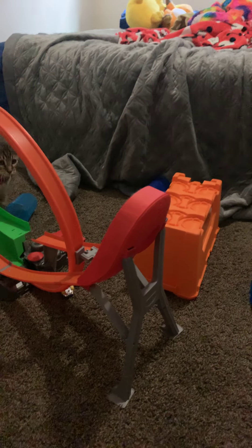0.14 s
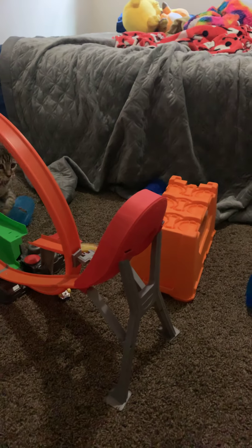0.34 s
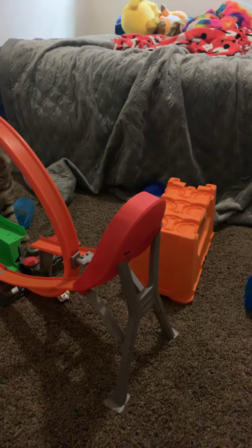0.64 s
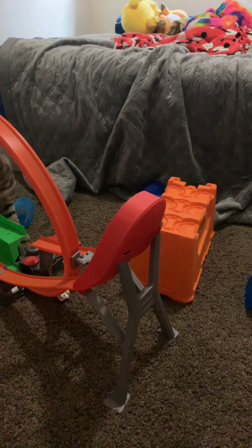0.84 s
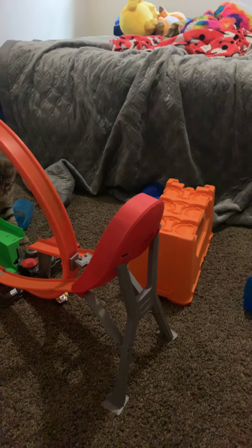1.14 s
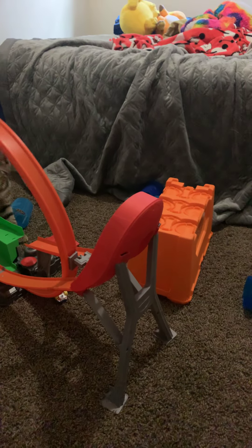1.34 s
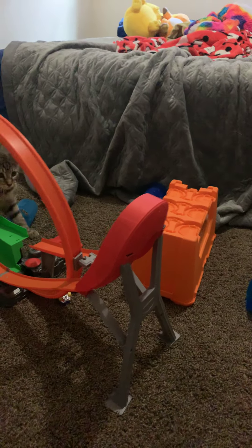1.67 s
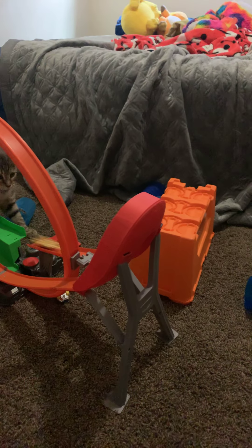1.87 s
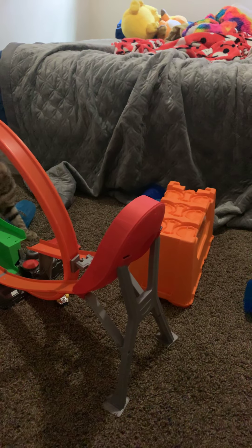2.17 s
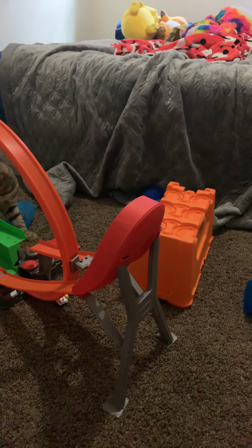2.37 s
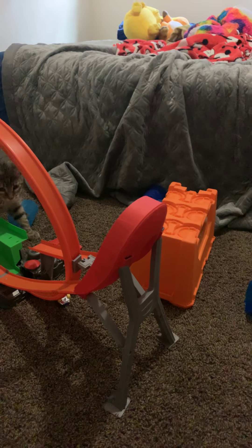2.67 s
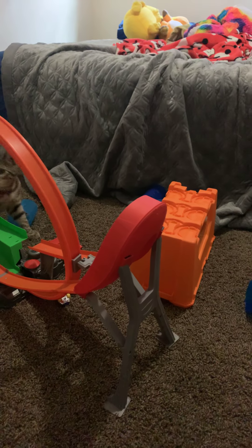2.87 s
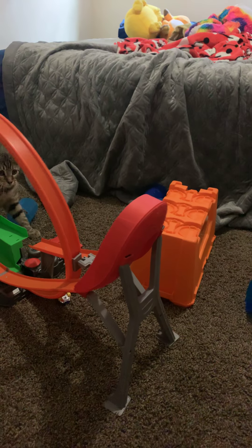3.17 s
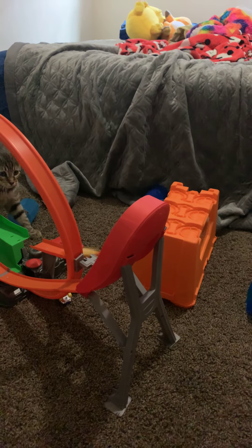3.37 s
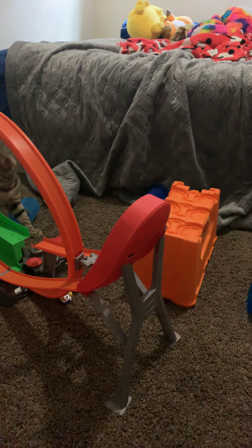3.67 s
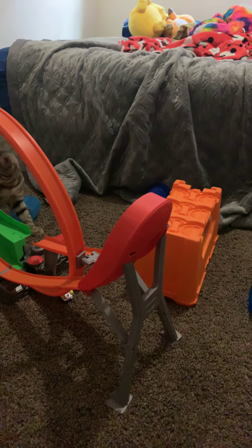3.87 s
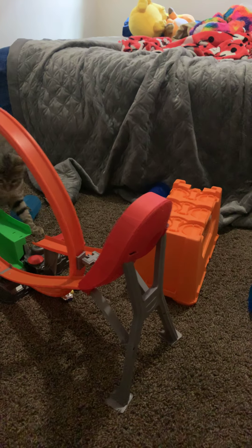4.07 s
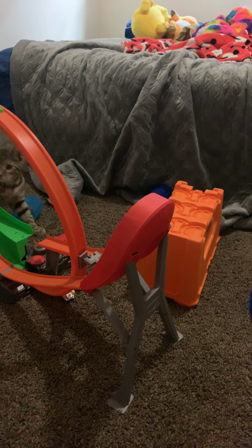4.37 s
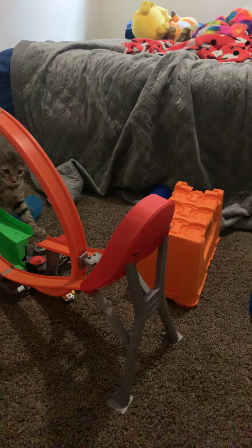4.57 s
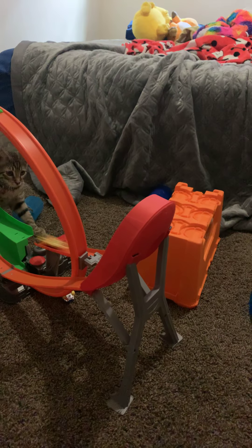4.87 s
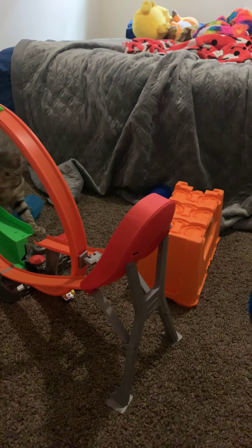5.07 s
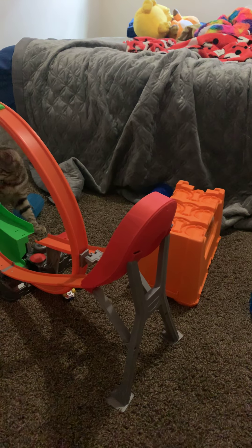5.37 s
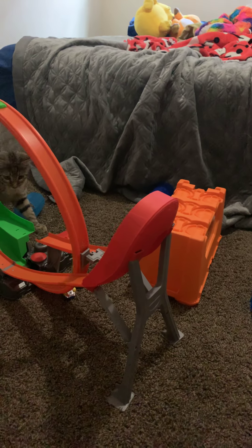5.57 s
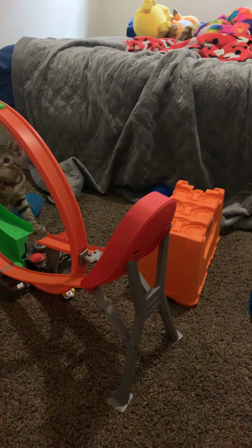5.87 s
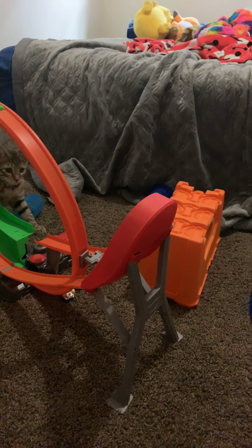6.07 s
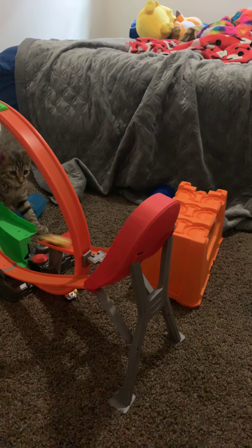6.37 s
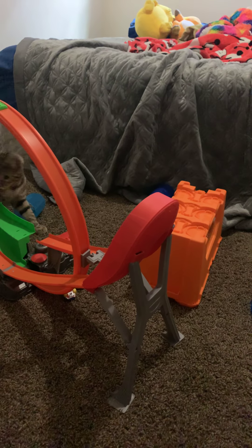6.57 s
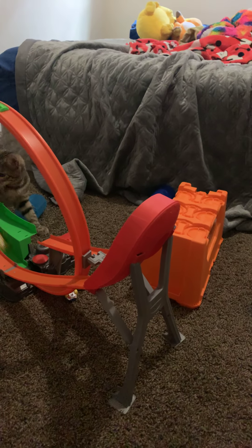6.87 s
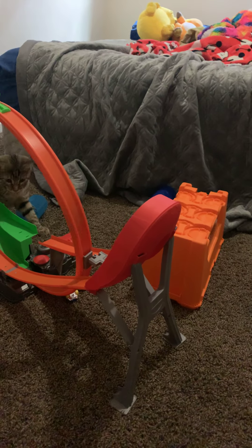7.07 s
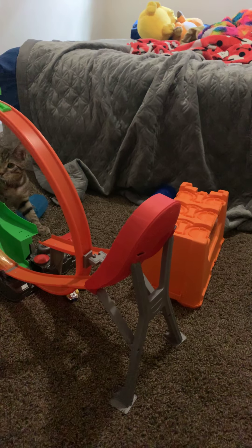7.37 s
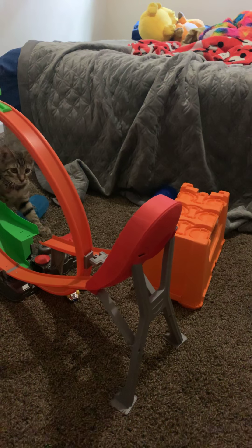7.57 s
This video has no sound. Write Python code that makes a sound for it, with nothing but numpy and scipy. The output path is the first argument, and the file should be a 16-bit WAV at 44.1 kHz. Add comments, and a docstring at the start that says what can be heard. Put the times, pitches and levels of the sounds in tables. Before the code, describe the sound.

A small metal toy car rattles and clacks round a plastic loop track, flung along by a droning, ticking motorized booster.

```python
"""In a carpeted room, a metal toy car laps a plastic track about every 1.5 s.
A battery booster drones and ticks all the time and flings the car twice a lap. The car runs round
a loop and over a ramp: its wheels chatter and whirr on the plastic, and its body clacks against
the joints. Three dull bumps come from the carpet, and the close walls add a short echo."""
import sys
import numpy as np
from scipy import signal
from scipy.fft import rfft, irfft
from scipy.io import wavfile

SR = 44100
rng = np.random.default_rng(int(sys.argv[2]) if len(sys.argv) > 2 else 0)


def to_wav(sig):
    """Store sig (one row per channel, or 1-D mono) as 16-bit WAV at the path in sys.argv[1].

    Samples outside -1..1 are clipped; the rate is SR.
    """
    pcm = np.clip(np.atleast_2d(sig), -1, 1) * 32767
    pcm = np.round(pcm).astype(np.int16)
    wavfile.write(sys.argv[1], SR, pcm.T)  # frames by channels


N = 340672
TIME = np.arange(N) / SR
ROOM_T60_S, ROOM_TREBLE_T60_S, ROOM_DB = 0.31, 0.24, -5  # a t60 is the time to fade by 60 dB
SPLIT_HZ = 1250  # rumble and thud lie below this, chatter and crack above

# dull bumps on the carpet: t/s, level/dB
CARPET_BUMPS = [(0.97, -49), (4.455, -43), (5.598, -54)]
# how loud the gears tick as time goes on: t/s, level/dB
TICK_LEVELS = [(0, -50), (.8, -45), (2.3, -44.5), (3.85, -46), (5.3, -48.5), (6.8, -45), (7.7, -43)]
# the car knocks on joints and walls: t/s, rough peak level/dB, clink f/Hz, clink against crack/dB
CAR_KNOCKS = [(0.018, -25, 3740, 6), (0.128, -26, 3930, 9), (0.173, -13, 3800, -11), (0.218, -17, 4570, 1),
              (0.256, -17, 5290, -8), (0.514, -17, 5100, -4), (0.537, -21, 4130, 7), (0.585, -16, 4600, -9),
              (0.619, -8, 4550, -5), (0.653, -18, 5800, 2), (0.827, -32, 5600, 2), (0.973, -20.5, 5430, 2),
              (1.026, -26, 4670, 5), (1.079, -20, 4590, 4), (1.091, -13, 5450, -15), (1.299, -23, 7340, -4),
              (1.497, -21, 4280, -7), (1.509, -20, 3800, -1), (1.518, -22, 4340, 3), (1.659, -13, 3600, -4),
              (1.827, -20, 3420, -6), (1.999, -17.5, 4150, -2), (2.008, -20, 3650, 0),
              (2.071, -13, 4470, -14), (2.123, -14.5, 4600, -7), (2.231, -26, 4750, -11),
              (2.439, -22, 5360, -11), (2.461, -20, 3800, -6), (2.552, -12, 4130, -6),
              (2.813, -22, 3610, -11), (3.016, -24, 4440, -6), (3.029, -20, 3730, -2),
              (3.039, -27, 4480, 8), (3.195, -12.5, 5530, -4), (3.242, -17, 4100, -5),
              (3.372, -19, 5340, -6), (3.547, -18, 4050, -1), (3.571, -14, 4270, -3), (3.580, -20, 3160, 6),
              (3.617, -15, 3080, -9), (3.653, -15, 5700, -8), (3.681, -7.5, 5030, -1),
              (3.917, -28, 4030, -2), (3.973, -17.5, 5600, 1), (4.098, -18, 5100, -14),
              (4.512, -18, 4340, 0), (4.520, -25, 4400, 7), (4.659, -14, 3750, -3), (4.843, -21, 3120, -8),
              (4.997, -19.5, 3660, 0), (5.008, -22, 3410, 5), (5.094, -14, 4540, -10),
              (5.454, -21, 5960, -6), (5.484, -18.5, 5220, 5), (5.577, -17, 4220, -15),
              (5.904, -27, 3880, 5), (5.994, -21, 5900, -9), (6.008, -22, 4200, -6), (6.159, -12, 3610, -6),
              (6.322, -15.5, 3580, -3), (6.496, -18, 3400, -3), (6.520, -17, 3420, 3),
              (6.562, -12, 4430, -6), (6.596, -10.5, 5370, -15), (6.879, -27, 5800, -4),
              (6.921, -20, 5700, 0), (7.027, -16, 3400, -4), (7.467, -15.5, 3830, -3),
              (7.483, -20, 4270, 2), (7.636, -17, 3510, 1)]

# the tone colour of each part, from bass to treble: f/Hz, level/dB
MOTOR_COLOUR = [(25, -62), (50, -15), (80, -6), (170, -15), (270, -10), (400, -7), (500, -3.5), (900, -3),
                (1300, -5.5), (2500, -11), (3800, -9), (5200, -6), (7500, -13), (9700, -13.5), (15500, -34)]
BOOSTER_COLOUR = [(35, -40), (60, -18), (226, -11.5), (385, -7.5), (486, -1.5), (613, -7.5), (773, -11),
                  (1100, -5), (1350, -7.5), (2780, -9), (3050, -3.5), (3420, -9), (4630, -7), (10400, -14),
                  (15500, -27.5)]
LOOP_COLOUR = [(59, -52), (100, -30), (438, -15.5), (614, -1.5), (668, -3.5), (1040, -5.5), (1340, -10.5),
               (1800, -10), (2420, -3), (2870, -4.5), (4280, -1.5), (4960, -4), (9340, -11), (10400, -10),
               (15500, -22.5)]
RAMP_COLOUR = [(35, -49), (60, -40), (145, -4.5), (175, -19), (231, -.5), (312, -11.5), (359, -16),
               (613, -1), (849, -6.5), (1120, -0.5), (1910, -1.5), (3670, 1.7), (5580, 1.2), (9970, -5.5),
               (15500, -18)]
KNOCK_COLOUR = [(100, -15), (230, -3), (380, 4.5), (500, 7), (1000, -4.5), (2000, -9.5), (3200, -1),
                (5500, 1), (8000, -2), (11000, -5.5), (15500, -19)]
# pitches that the gear teeth, booster housing and open track lift or dull: f/Hz, width/Hz, lift/dB
GEAR_RESONANCES = [(5250, 1300, 22), (5925, 370, 15), (6565, 87, 22.5), (9070, 1300, 1)]
HOUSING_RESONANCES = [(148, 24, 6.5), (228, 24, 3), (410, 127, -6.5), (500, 55, 2.8), (614, 98, 10),
                      (720, 100, 4), (779, 72, 5.5), (856, 28, 7), (938, 55, 4), (1017, 18, 4),
                      (1350, 200, -5.5), (4590, 140, 2.5), (5900, 220, 3.5)]
TRACK_RESONANCES = [(243, 40, -4.5), (384, 160, 2), (615, 37, 5), (1011, 31, 4.5), (1320, 47, -1.5),
                    (1594, 33, 6), (3705, 160, 3.5), (4480, 120, 4), (5890, 110, 6)]

# Four tables say when the car passes each place; 0 dB is a usual pass.
# the booster's first fling of a lap: t/s, chatter/dB, rumble/dB, grip whirr/dB, coasting whirr/dB
FIRST_FLING_PASSES = [(0.514, 0, 1, 0, -6), (1.998, .5, .5, -7, 0), (3.547, -.7, 1.5, 0, -7),
                      (4.997, .3, .5, -5, 2), (6.495, .3, 1, -1.5, -5)]
# its second fling, then the loop, then the ramp: t/s, chatter/dB, rumble/dB, whirr or swoosh/dB
SECOND_FLING_PASSES = [(1.083, 0, 0, -5), (2.546, 0, -1, -1), (4.092, 0, -1, -6), (5.570, .8, 1, 2),
                       (7.029, 0, 1, -1)]
LOOP_PASSES = [(-0.36, 0, 0, 0), (1.15, .5, 0, 0), (2.62, -1.7, -1.5, -2), (4.16, .7, 1, 1),
               (5.64, 0, 0, -2), (7.10, -1.5, 0, 1.5)]
RAMP_PASSES = [(0.116, -.5, 0, 0), (1.61, 0, -2.5, -3), (3.13, 0, -1, 0), (4.61, 0, -1, 2),
               (6.1, -.3, -.5, .5), (7.58, 1, 0, .5)]
CHATTER, RUMBLE, WHIRR, COASTING = 1, 2, 3, 4  # column numbers in these tables

# how the track shakes at each pass: delay/s, rise/s, hold/s, fade t60/s, level/dB
GRIP_CHATTER = (-.002, .043, .1, .32, -28.8)  # the booster's wheels seize the car
GRIP_RUMBLE = (.045, .02, .02, .4, -35.5)
ENTRY_RUMBLE = (-.001, .005, .025, .3, -41.5)
RETURN_CHATTER = (-.26, .17, .055, .45, -33.6)  # it rolls back towards the booster
RETURN_RUMBLE = (-.125, .015, .035, .45, -42.3)
KICK_CHATTER = (-.008, .018, .015, .38, -27.3)  # the second fling is one short kick
KICK_RUMBLE = (-.005, .014, .012, .28, -34.3)
CLIMB_CHATTER = (-.03, .04, .03, 1.5, -36.5)  # it slows on the way up the loop
DESCENT_CHATTER = (.1, .19, .15, .5, -34.4)  # and gathers speed on the way down
LOOP_RUMBLE = (-.06, .3, .16, .5, -46)
FOOT_CHATTER = (-.12, .025, .015, .3, -35)  # it presses into the foot of the loop, just before the ramp
FOOT_RUMBLE = (-.16, .025, .045, .3, -40.5)
RAMP_CHATTER = (-.028, .052, .055, 1.0, -28.6)
RAMP_RUMBLE = (.03, .04, .015, .45, -37.5)
RUNOUT_CHATTER = (.17, .035, .025, .72, -34.2)  # it comes off the ramp and coasts away
RUNOUT_RUMBLE = (.2, .03, .03, .6, -48)

# the whirrs and swoosh of each lap: delay/s, length/s, first f/Hz, last f/Hz, width/Hz, level/dB
GRIP_WHIRR = (.005, .16, 3050, 3040, 135, -35.3)
COAST_WHIRR = (.04, .23, 4590, 4590, 150, -43)
KICK_WHIRR = (0, .07, 3050, 3020, 200, -36)
LOOP_WHIRR = (-.03, .2, 2560, 2490, 250, -41.5)
DESCENT_WHIRR = (.22, .15, 4100, 4120, 400, -41)
LOW_DESCENT_WHIRR = (.21, .13, 2450, 2450, 250, -41.5)  # a second, lower whirr on the way down the loop
FOOT_WHIRR = (-.125, .08, 4200, 4100, 550, -42)
RAMP_SWOOSH = (.003, .085, 2800, 1250, 700, -34.3)


def undb(db):
    """Turn decibels into a number to multiply a sound by."""
    return 10 ** (np.asarray(db) / 20)


def unit(x):
    """Scale a sound so that its average strength (rms) is 1."""
    return x / np.sqrt(np.mean(x ** 2))


def keep_band(x, hz, side, order=4):
    """Keep the "low" or the "high" side of a sound, split at hz."""
    return signal.sosfilt(signal.butter(order, hz, side, fs=SR, output="sos"), x)


def fade(t, t60):
    """A fade that loses 60 dB by the time t reaches t60."""
    return np.exp(-np.log(1000) * t / t60)


def wander(rate):
    """A random drift of about size 1 that changes course rate times a second."""
    points = rng.standard_normal(N // 10)
    return unit(np.interp(TIME * rate, np.arange(len(points)), points))


def add(out, start_s, sound):
    """Mix a sound in at start_s, dropping whatever falls outside the scene."""
    start = int(start_s * SR)
    sound = sound[max(-start, 0):]
    start = max(start, 0)
    out[start:start + len(sound)] += sound[:max(N - start, 0)]


def ring(x, colour, resonances=(), size=8192):
    """Play x through an object that has a broad tone colour and rings at a few pitches."""
    f = np.arange(size // 2 + 1) * SR / size
    hz, db = np.transpose(colour)
    gain_db = np.interp(np.log(f + 1), np.log(hz), db)
    for centre, width, lift in resonances:
        gain_db = gain_db + lift / (1 + (2 * (f - centre) / width) ** 2)
    # these steps make the object ring only after each push, never before it
    cepstrum = irfft(np.log(undb(gain_db)))
    cepstrum[1:size // 2] *= 2
    cepstrum[size // 2 + 1:] = 0
    response = irfft(np.exp(rfft(cepstrum)))
    return signal.fftconvolve(x, response)[:len(x)]


def room(x):
    """Close walls answer within milliseconds; carpet and bedding soak up the treble first."""
    t = np.arange(SR // 2) / SR
    noise = rng.standard_normal(len(t))
    low = keep_band(noise, 2700, "low", order=1)
    tail = (low * fade(t, ROOM_T60_S) + (noise - low) * fade(t, ROOM_TREBLE_T60_S)) * (t > .004)
    echo = signal.fftconvolve(x, tail / np.sqrt(np.sum(tail ** 2)))[:N]
    return (x + undb(ROOM_DB) * echo) / np.sqrt(1 + undb(ROOM_DB) ** 2)


def carpet_bumps(t60, top_hz):
    """Soft, heavy bumps on the floor carry only bass."""
    out, t = np.zeros(N), np.arange(2 ** 14) / SR
    for start_s, db in CARPET_BUMPS:
        bass = keep_band(rng.standard_normal(len(t)), top_hz, "low", order=2)
        boom = unit(keep_band(bass, 50, "high"))
        soft_start = 1 - fade(t, t60 / 10)
        add(out, start_s, undb(db) * boom * fade(t, t60) * soft_start)
    return out


def chatter(per_second, spread_db, t60, hiss):
    """Tiny hits of uneven size each send a short shiver through the plastic, over a smooth hiss."""
    sizes = undb(spread_db * np.minimum(rng.exponential(size=N), 3))
    hits = (rng.random(N) < per_second / SR) * sizes ** 2
    energy = signal.lfilter([1], [1, -fade(2 / SR, t60)], hits)  # each hit dies away
    return unit(np.sqrt(energy / energy.mean() + hiss ** 2) * rng.standard_normal(N))


def booster_motor(drone_db, turn_hz, wobble, tick_t60, tick_spread_db):
    """The booster's gears drone in their housing; a loose gear ticks unevenly, once a turn."""
    grinding = chatter(per_second=540, spread_db=2.5, t60=0.02, hiss=1.0)
    drone = ring(grinding, MOTOR_COLOUR, HOUSING_RESONANCES)
    turns = np.cumsum(turn_hz * np.exp(wobble * wander(90))) / SR
    hits = np.diff(np.floor(turns), prepend=0) * undb(tick_spread_db * wander(100))
    bursts = signal.lfilter([1], [1, -fade(1 / SR, tick_t60)], hits) * rng.standard_normal(N)
    ticks = ring(bursts, [(1000, -11), (4000, -18), (8000, -1), (15000, -14)], GEAR_RESONANCES)
    tick_db = np.interp(TIME, *np.transpose(TICK_LEVELS))
    return undb(drone_db + 1.25 * wander(16)) * unit(drone) + undb(tick_db) * unit(ticks)


def wheel_whirrs(wobble):
    """Narrow, nearly steady whirrs ring at the same places every lap; a swoosh falls at the ramp."""
    out = np.zeros(N)
    places = [(FIRST_FLING_PASSES, WHIRR, GRIP_WHIRR), (FIRST_FLING_PASSES, COASTING, COAST_WHIRR),
              (SECOND_FLING_PASSES, WHIRR, KICK_WHIRR), (LOOP_PASSES, WHIRR, LOOP_WHIRR),
              (LOOP_PASSES, WHIRR, LOW_DESCENT_WHIRR), (LOOP_PASSES, WHIRR, DESCENT_WHIRR),
              (RAMP_PASSES, WHIRR, FOOT_WHIRR), (RAMP_PASSES, WHIRR, RAMP_SWOOSH)]
    for passes, column, (delay_s, length_s, first_hz, last_hz, width_hz, db) in places:
        progress = np.linspace(0, 1, int(length_s * SR))
        centre_hz = first_hz * (last_hz / first_hz) ** progress
        swell = np.sqrt(np.abs(np.sin(np.pi * progress)))
        for row in passes:
            real, imag, sway = rng.standard_normal((3, SR // 2))[:, :len(progress)]
            hz = centre_hz * (1 + wobble * unit(keep_band(sway, 37.5, "low", order=2)))
            # slow noise, moved up to that pitch, makes a rough tone
            buzz = keep_band(real + 1j * imag, width_hz / 2, "low", order=2)
            tone = unit(np.real(buzz * np.exp(2j * np.pi * np.cumsum(hz) / SR)))
            add(out, row[0] + delay_s, tone * swell * undb(db + row[column]))
    return out


def axle_rattle(spread_db, count=3600):
    """The loose axles and body tap at random; each tap rings briefly at a pitch of its own."""
    when, pitch, size, phase = rng.random((count, 4)).T[:, :, None]
    hz = 600 * 24 ** pitch
    samples = np.arange(2 ** 10)
    cycles = hz * samples / SR
    # plastic damps every pitch within 36 cycles, so high taps are shorter and harder
    taps = hz * undb(spread_db * size) * np.sin(2 * np.pi * (cycles + phase)) * fade(cycles, 36)
    positions = (when * N + samples).astype(int)
    return unit(np.bincount(positions.ravel(), taps.ravel(), N)[:N])


def car_wheels(per_second, spread_db, hiss, rattle_db):
    """The moving car feeds the track with wheel chatter and its own rattle, which has little treble."""
    rattle = keep_band(axle_rattle(spread_db=12), 6500, "low", order=2)
    return chatter(per_second, spread_db, t60=0.022, hiss=hiss) + undb(rattle_db) * rattle


def shaking(column, *stages, uneven_db=.5):
    """How hard the car shakes the track: each pass rises, holds and fades, a little unevenly."""
    power = np.zeros(N)
    for passes, (delay_s, rise_s, hold_s, fade_t60, db) in stages:
        for row in passes:
            t = TIME - row[0] - delay_s
            rise = np.clip(t / rise_s, 0, 1)
            fall = fade(np.clip(t - rise_s - hold_s, 0, 2), fade_t60)
            power += (rise * fall * undb(db + row[column])) ** 2
    return np.sqrt(power) * undb(uneven_db * wander(60))


def roll(chatter_gain, rumble_gain, wheels, colour, resonances, hardness):
    """The wheels shake a piece of track: bright chatter where they touch, rumble from the whole piece."""
    sound = ring(wheels, colour, resonances)
    bright = unit(keep_band(sound, SPLIT_HZ, "high"))
    rumble = unit(keep_band(sound, SPLIT_HZ, "low"))
    # harder hits are shorter, so the highest treble grows faster than the rest
    treble = keep_band(bright, 8000, "high", order=1)
    treble_gain = np.clip(chatter_gain / undb(-30), .1, 3) ** hardness
    return chatter_gain * (bright + treble * (treble_gain - 1)) + rumble_gain * rumble


def through_booster():
    """The booster grips and flings the car, which rolls back round and is kicked on a second time."""
    chatter_gain = shaking(CHATTER, (FIRST_FLING_PASSES, GRIP_CHATTER),
                           (SECOND_FLING_PASSES, RETURN_CHATTER), (SECOND_FLING_PASSES, KICK_CHATTER))
    rumble_gain = shaking(RUMBLE, (FIRST_FLING_PASSES, ENTRY_RUMBLE), (FIRST_FLING_PASSES, GRIP_RUMBLE),
                          (SECOND_FLING_PASSES, RETURN_RUMBLE), (SECOND_FLING_PASSES, KICK_RUMBLE))
    wheels = car_wheels(per_second=340, spread_db=1.5, hiss=0.86, rattle_db=-3)
    return roll(chatter_gain, rumble_gain, wheels, BOOSTER_COLOUR, HOUSING_RESONANCES, hardness=0.53)


def round_loop():
    """The car's chatter fades as it climbs the loop and grows again on the way down to its foot."""
    chatter_gain = shaking(CHATTER, (LOOP_PASSES, CLIMB_CHATTER), (LOOP_PASSES, DESCENT_CHATTER),
                           (RAMP_PASSES, FOOT_CHATTER))
    rumble_gain = shaking(RUMBLE, (LOOP_PASSES, LOOP_RUMBLE), (RAMP_PASSES, FOOT_RUMBLE))
    wheels = car_wheels(per_second=350, spread_db=2, hiss=0.9, rattle_db=-3.5)
    return roll(chatter_gain, rumble_gain, wheels, LOOP_COLOUR, TRACK_RESONANCES, hardness=0.3)


def over_ramp():
    """The car rushes over the ramp and coasts off towards the booster."""
    chatter_gain = shaking(CHATTER, (RAMP_PASSES, RAMP_CHATTER), (RAMP_PASSES, RUNOUT_CHATTER))
    rumble_gain = shaking(RUMBLE, (RAMP_PASSES, RAMP_RUMBLE), (RAMP_PASSES, RUNOUT_RUMBLE))
    wheels = car_wheels(per_second=360, spread_db=2, hiss=1.0, rattle_db=-4)
    return roll(chatter_gain, rumble_gain, wheels, RAMP_COLOUR, TRACK_RESONANCES, hardness=0.2)


def car_knocks(crack_t60, clink_t60, thud_t60, clatter_t60, clink_width_hz, thud_db, clatter_db):
    """Metal hits plastic: a sharp crack, a clink that varies from spot to spot, a thud of the housing."""
    out, t = np.zeros(N), np.arange(2 ** 13) / SR
    # after the crack the jointed track goes on clattering for a moment
    crack_shape = fade(t, crack_t60) + undb(clatter_db) * fade(t, clatter_t60)
    for start_s, db, hz, clink_db in CAR_KNOCKS:
        crack_noise, thud_noise = rng.standard_normal((2, len(t)))
        crack = unit(keep_band(ring(crack_noise * crack_shape, KNOCK_COLOUR), SPLIT_HZ, "high"))
        # five close pitches beat against each other
        pitches = hz + clink_width_hz * (np.linspace(-.5, .5, 5) + .1 * rng.standard_normal(5))
        tones = np.sin(2 * np.pi * (pitches[:, None] * t + rng.random((5, 1))))
        clink = unit(tones.sum(axis=0) * fade(t, clink_t60))
        housing = ring(thud_noise * fade(t, thud_t60), KNOCK_COLOUR, HOUSING_RESONANCES)
        thud = unit(keep_band(housing, SPLIT_HZ, "low"))
        rough_peak = 3.4 * np.std(crack[:SR // 250])  # from the crack's first 4 ms
        knock = crack + undb(clink_db) * clink + undb(thud_db) * thud
        add(out, start_s, undb(db) / rough_peak * knock)
    return out


def scene():
    """The car and the running booster, each sound with its own room echo, plus the carpet bumps."""
    knocks = car_knocks(crack_t60=.028, clink_t60=.04, thud_t60=0.064, clatter_t60=0.185,
                        clink_width_hz=790, thud_db=-16, clatter_db=-6.5)
    motor = booster_motor(drone_db=-44.0, turn_hz=78.6, wobble=.35, tick_t60=.018, tick_spread_db=3.5)
    sources = (through_booster(), round_loop(), over_ramp(), knocks, wheel_whirrs(wobble=0.0121), motor)
    return (sum(map(room, sources)) + carpet_bumps(t60=0.19, top_hz=200))[None]


def record(dry):
    """Cut away the very highest treble, above 15800 Hz."""
    return signal.sosfilt(signal.ellip(10, .1, 80, 15800, fs=SR, output="sos"), dry)


dry = scene()
out = record(dry)
to_wav(out)
```